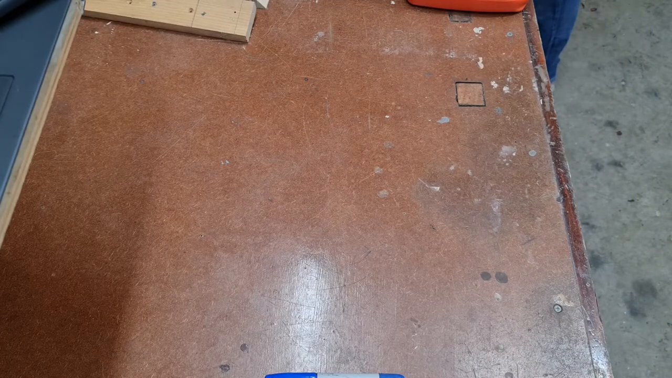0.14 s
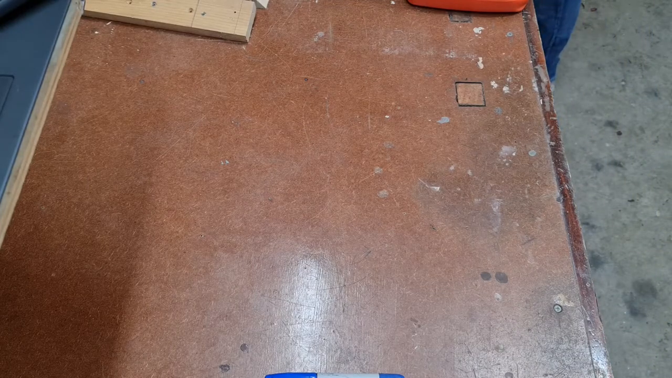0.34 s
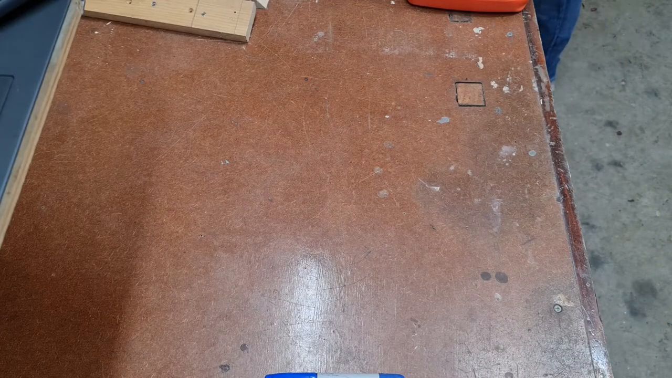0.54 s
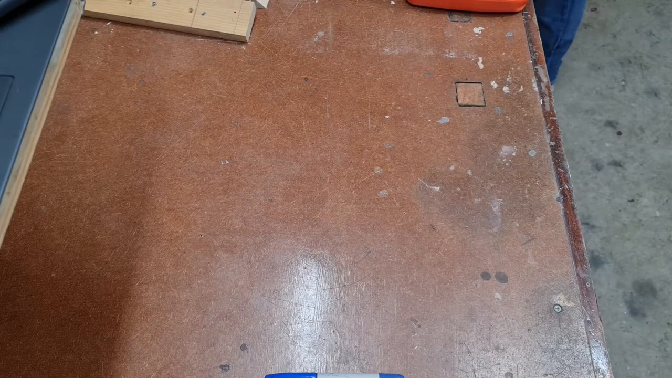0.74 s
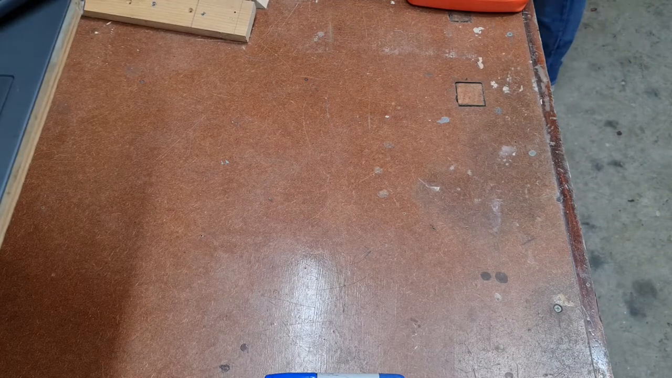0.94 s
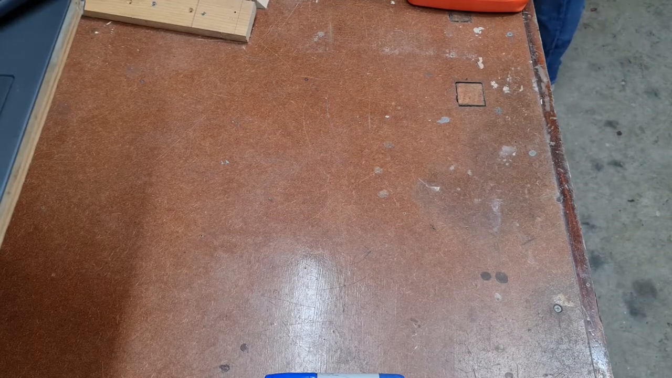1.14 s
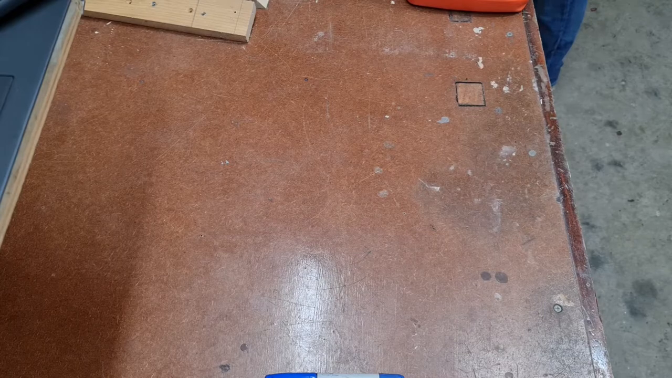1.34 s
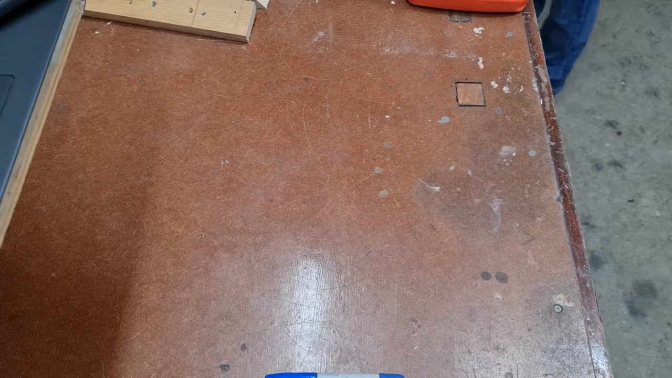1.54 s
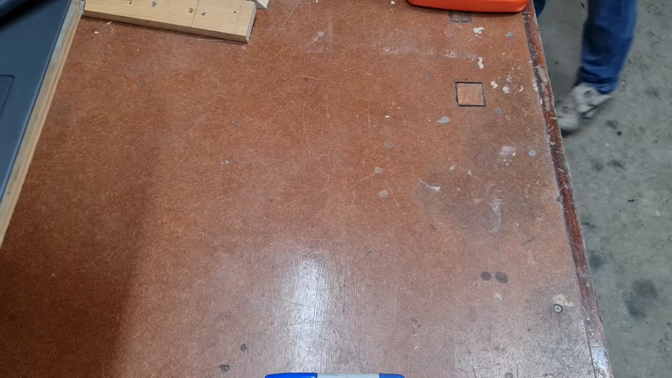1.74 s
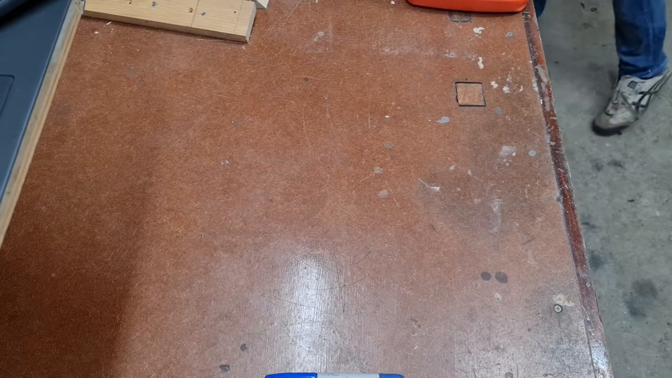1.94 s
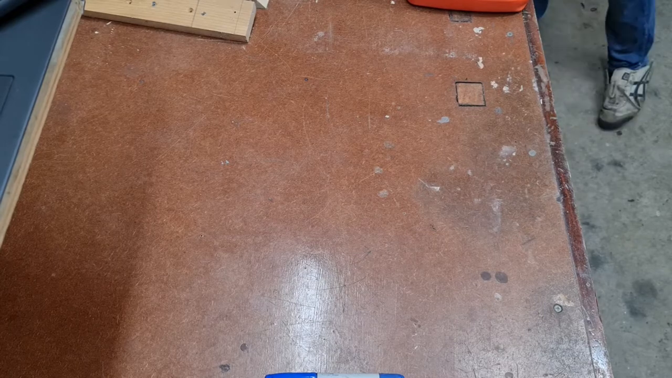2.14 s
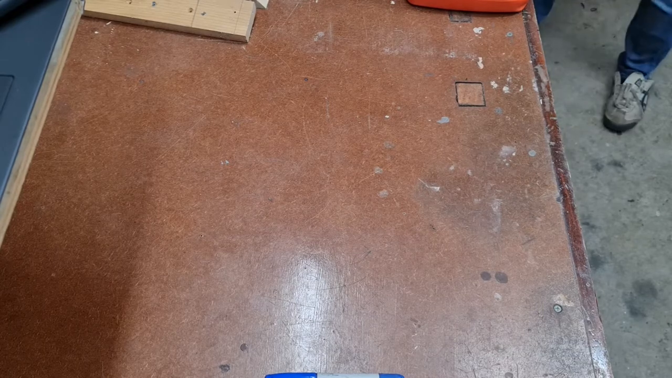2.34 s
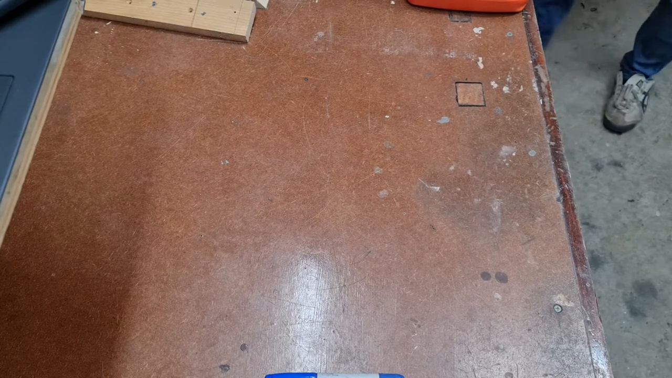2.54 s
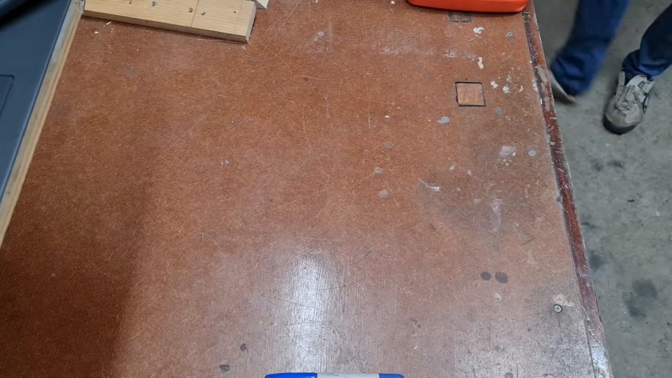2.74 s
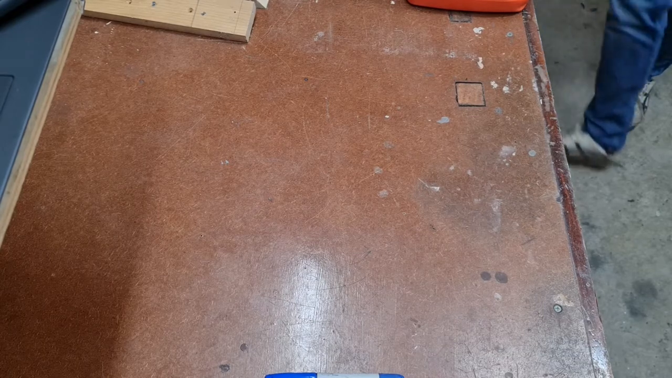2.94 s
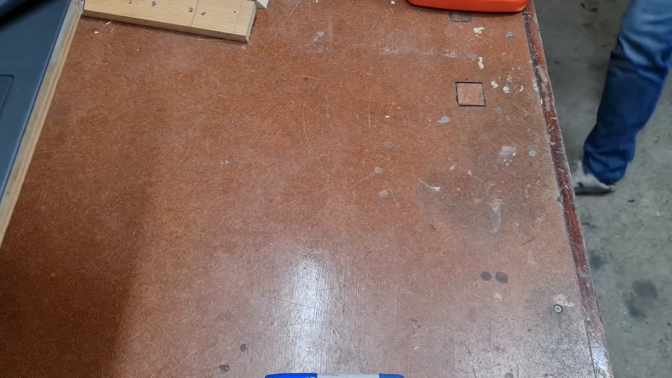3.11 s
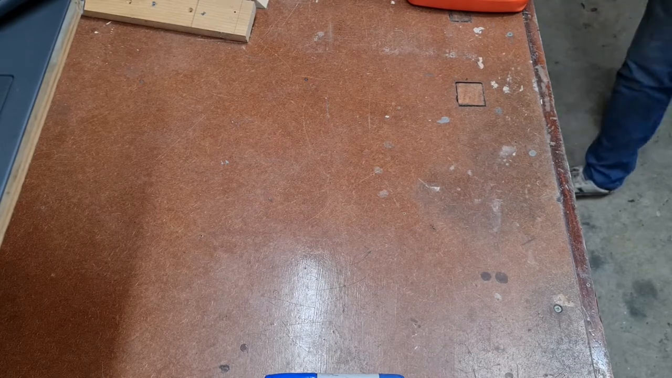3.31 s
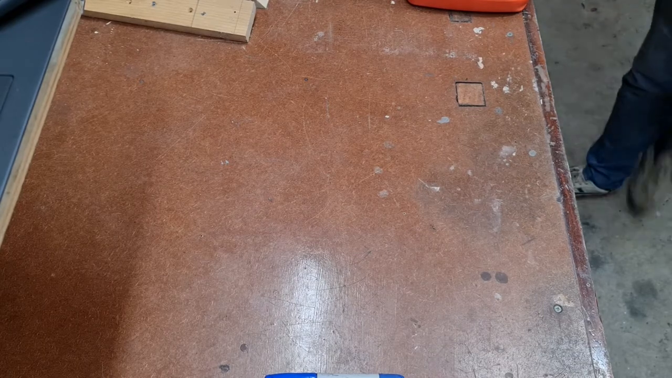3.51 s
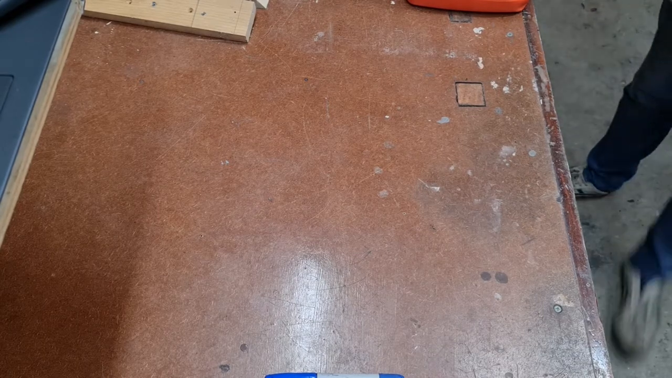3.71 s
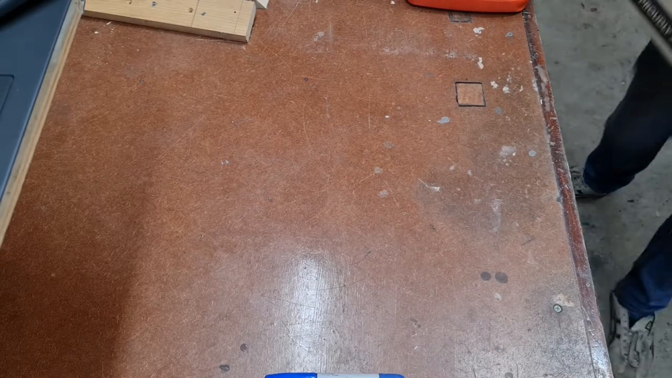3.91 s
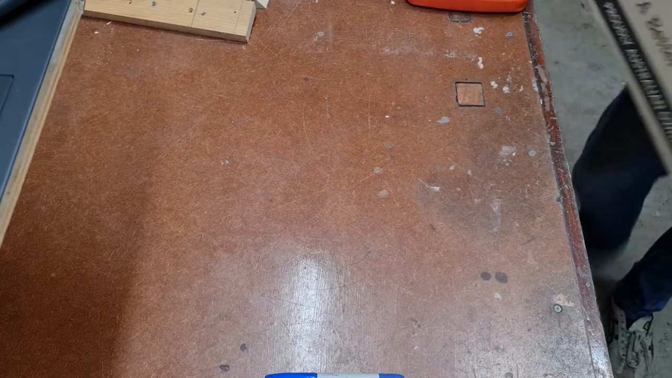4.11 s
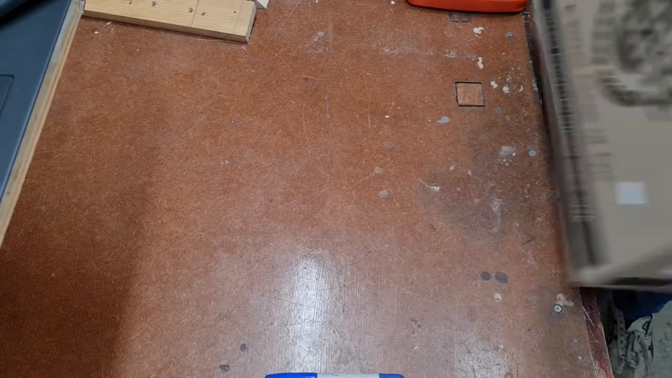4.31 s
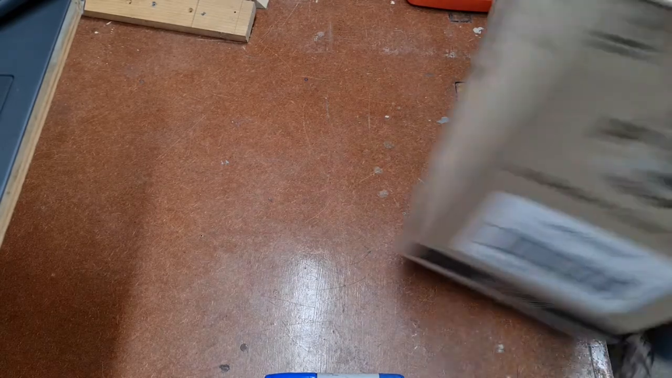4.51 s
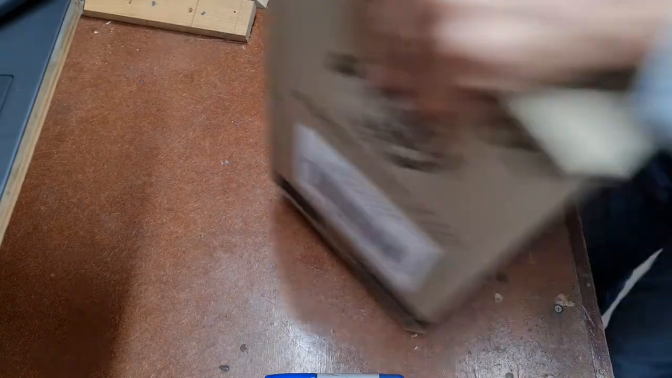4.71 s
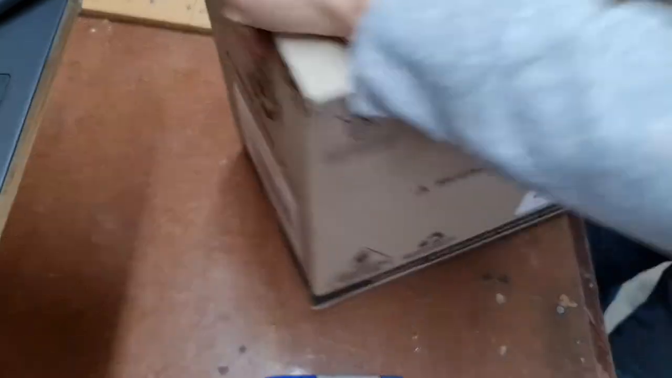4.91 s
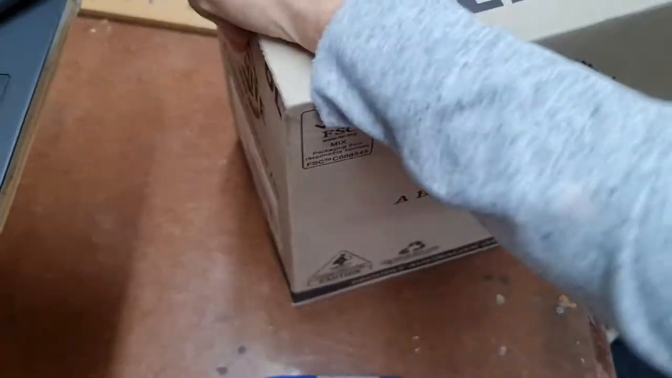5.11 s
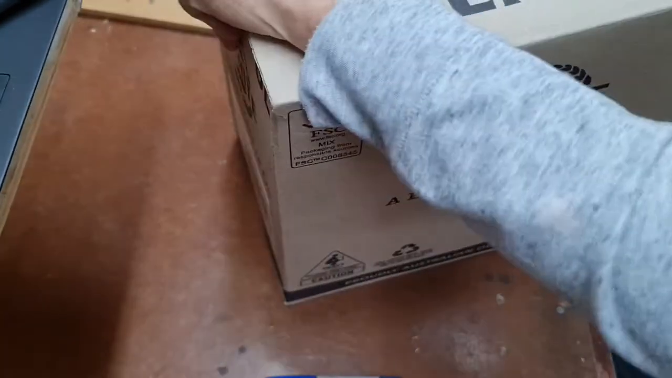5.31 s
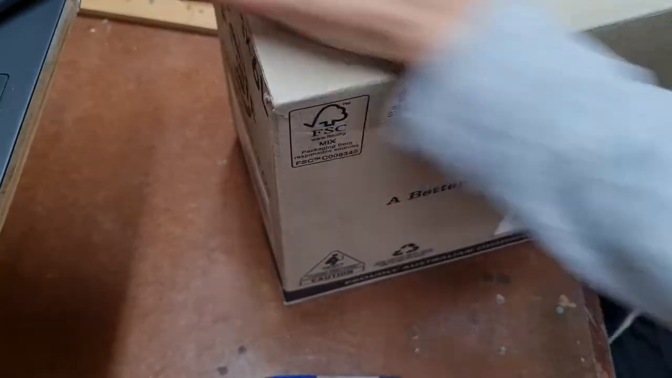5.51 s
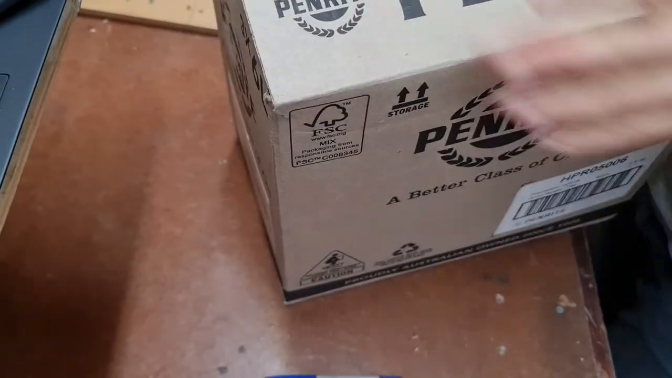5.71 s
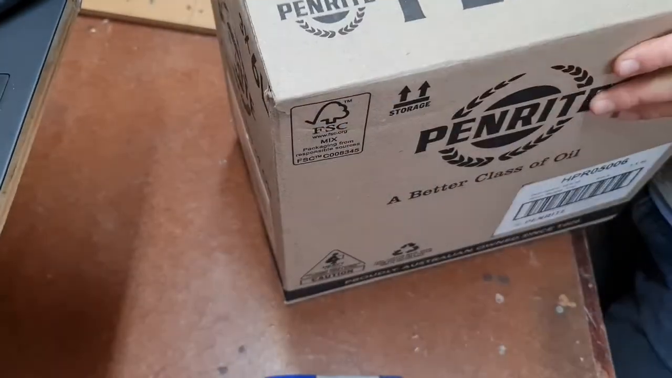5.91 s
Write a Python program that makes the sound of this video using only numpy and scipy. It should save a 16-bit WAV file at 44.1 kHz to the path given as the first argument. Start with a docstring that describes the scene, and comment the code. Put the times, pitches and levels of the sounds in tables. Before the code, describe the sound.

A close stereo microphone on a workbench hears faint garage hum, a box dragged and knocked early on, then quiet shuffling steps with a tiny clink. Light card bumps lead into a sudden heavy slam, edge first and then the whole base slapping down on wood. Loose metal buzzes briefly; afterwards come soft card rubbing, a snap and little squeaks.

```python
"""A cardboard box is dragged up, carried past with shuffling steps and light knocks, then dropped on a
wooden bench: one edge lands, the rest slaps down. Knocks ring the box panels, bumps ring the bench.
Metal things on the bench rattle as buzzing clusters of tones. Hands rub (shaped noise) and squeak
(uneven tones) on the card, small things clink and snap; the garage adds a low noisy hum and a short echo."""
import sys
import numpy as np
from scipy import signal
from scipy.fft import rfft, irfft, next_fast_len
from scipy.io import wavfile
from scipy.ndimage import uniform_filter1d

SR = 44100
rng = np.random.default_rng(int(sys.argv[2]) if len(sys.argv) > 2 else 0)


def file_out(sig):
    """Save sig as 16-bit WAV at sys.argv[1]."""
    # one column per channel
    cols = np.atleast_2d(sig).T
    # limit, then scale
    lim = np.clip(cols, -1, 1)
    pcm = np.round(lim * 32767).astype(np.int16)
    wavfile.write(sys.argv[1], SR, pcm)


N = 266974
T = np.arange(N) / SR

# Ringing panels of the box: f/Hz, relative level/dB, time to die by 60 dB/s
BOX_PANELS = [(165.2, 13.5, 0.054), (272, -2.5, 0.54), (319, -1, 0.33), (410, -3.5, 0.29), (461, 9, 0.035),
              (505.7, -8, 0.3), (598.5, 3.5, 0.074), (660.7, -6, 0.26), (733.5, 6.5, 0.038),
              (826.6, 8, 0.059), (965, 0, 0.033), (1142, -7.5, 0.2), (1290.5, 10, 0.033),
              (1450, -4.5, 0.056), (1521, -5.5, 0.08), (1699, -4, 0.24), (2380, -7, .08),
              (2652, -2.5, 0.08)]


def knocks(mix):
    """Each contact rings the panels near its colour, crumples the card and scuffs it."""
    # Knocks and steps: t/s, peak level/dB, colour f/Hz, narrowness/(dB per octave squared),
    # added damping as time to die by 60 dB/s
    knock_list = [(0.759, -14.5, 1230, 18, 0.11), (0.797, -38, 1580, 15, 0.076),
                  (0.911, -36, 1090, 22, 0.087), (1.069, -41.5, 520, 16, 0.078),
                  (1.326, -36, 423, 56, 0.12), (1.325, -44, 1260, 44, 0.048), (1.495, -41, 404, 59, 0.2),
                  (1.585, -50, 410, 44, 0.1), (1.894, -49.5, 470, 15, 0.14), (2.075, -47.5, 307, 19, 0.11),
                  (2.34, -44.5, 520, 25, 0.17), (2.454, -50, 422, 38, 0.073), (3.157, -45.5, 634, 20, 0.14),
                  (3.249, -47, 296, 16, 0.064), (3.69, -48.5, 316, 25, 0.13), (3.734, -41.5, 555, 28, 0.11),
                  (3.87, -47.5, 500, 4.5, 0.15), (3.918, -45.5, 920, 5, .11),
                  (4.148, -47.5, 540, 22, 0.044), (4.357, -45.5, 800, 2.5, 0.21),
                  (4.575, -35.5, 302.4, 0, 0.25), (4.65, -41, 305, 3, 0.031),
                  (4.732, -40.5, 406, 22, 0.078), (4.781, -32.5, 310, 9, 0.073),
                  (4.857, -31, 390, 1.5, .36), (4.902, -12, 590, 6, 0.094), (4.9126, -1.5, 840, 31, 0.061),
                  (4.925, -11, 792, 22, 0.14), (4.932, -11, 373, 28.5, 0.086), (4.953, -18, 635, 32, 0.066),
                  (4.974, -18, 630, 31, 0.066), (5.036, -10.5, 398, 1.5, 0.065),
                  (5.049, -10, 876, 3.5, 0.059), (5.06, -12, 814, 8, 0.049), (5.09, -24.5, 1630, 21, 0.066),
                  (5.077, -15, 443, 8, 0.064), (5.11, -21, 340, 7.5, 0.097), (5.58, -32.5, 451, 8, 0.18),
                  (5.925, -35, 796, 2, 0.17)]
    panel_count = len(BOX_PANELS)
    for s, db, colour_hz, narrow_db, t60 in knock_list:
        contact_s = .0058 + .00006 * db  # a harder knock squashes the card for longer
        t = np.arange(round(.3 * SR)) / SR
        u = t / contact_s  # time counted in contacts

        # where the knock lands changes each panel's level and phase; the grip detunes it a little
        spot_db = 2 * rng.standard_normal(panel_count)
        phase = rng.uniform(0, 2 * np.pi, (panel_count, 1))
        bend = 1 + 0.0063 * rng.standard_normal(panel_count)
        modes = []
        for (hz, level, decay), spot, b in zip(BOX_PANELS, spot_db, bend):
            octaves_off = np.log2(hz / colour_hz)
            modes.append((hz * b, level + spot - narrow_db * octaves_off ** 2, decay))
        panels = ring(modes, .3, t60, 2.6 * contact_s, phase)

        crumple_shape = u ** 2 * np.exp(-.8 * u)
        band = signal.butter(3, [colour_hz * 0.65, colour_hz * 1.46], "band", fs=SR, output="sos")
        crumple = signal.sosfilt(band, rng.standard_normal(len(u)) * crumple_shape)

        # card swallows the treble of a scuff
        scuff_band_hz = [min(colour_hz * 0.37, 600), min(colour_hz * 2.66, 1560)]
        scuff_shape = np.minimum(u / 2, 1) * gain_of(-60 * t / (1.7 * t60))
        wide = signal.butter(7, scuff_band_hz, "band", fs=SR, output="sos")
        scuff = signal.sosfilt(wide, rng.standard_normal(len(u)) * scuff_shape)
        scuff_share = .2 - .007 * db  # light steps scuff more than hard blows

        knock = evened(panels) + 0.49 * evened(crumple) + scuff_share * evened(scuff)
        add(mix, s - .002, peaked(knock, db))  # the swell starts just before the listed time


def bench(mix):
    """Each low bump is a half-sine push ringing the slab; in the landing they crowd into a shuddering thud."""
    # Weight of the box bumping on wood: t/s, peak level/dB, contact time/s
    bumps = [(0.765, -27, 0.0029), (0.79, -28, 0.0027), (1.075, -36, 0.0037), (1.299, -37, .005),
             (1.345, -31.5, 0.0029), (4.581, -31, 0.0032), (4.784, -33, 0.0035), (4.902, -11, 0.0066),
             (4.935, -1.5, 0.0043), (4.954, -3, .0044), (4.967, -13, 0.0049), (4.993, -11, 0.0027),
             (5.043, -15, 0.0091), (5.068, -7, 0.0036), (5.109, -19, 0.0038), (5.135, -26, 0.0072),
             (5.215, -37, 0.0024), (5.88, -34.5, 0.0089), (5.963, -29.5, 0.0028)]
    # Modes of the bench: f/Hz, relative level/dB, time to die by 60 dB/s
    slab_modes = [(74, -28, 0.98), (102, -5.5, 0.17), (146.8, 8.5, 0.13), (194, 8, 0.084),
                  (266.5, 12.5, 0.059)]
    slab = ring(slab_modes, .5)
    for s, db, contact_s in bumps:
        push = np.sin(np.linspace(0, np.pi, round(contact_s * SR)))
        add(mix, s, peaked(signal.fftconvolve(push, slab), db))


def tools():
    """Noisy shaking makes each loose metal piece buzz at three close modes, in a fit of its own."""
    # Metal pieces: f/Hz, level/dB, time to die by 60 dB/s, fit at full from t/s, fit held for/s
    pieces = [(1810, -43.5, 0.039, 5.08, 0.078), (2330, -44.5, 0.028, 5.078, 0.057),
              (2670, -42, 0.017, 4.912, .02), (3770, -56.5, 0.034, 5.146, 0.09),
              (1770, -59.5, 0.039, 5.21, 0.092), (2840, -46, 0.012, 4.978, 0.01),
              (6150, -63, .03, 5.12, 0.08), (2300, -62.5, .02, 5.21, 0.093)]
    split = .012  # share by which the close modes lie apart
    shaking = grit(2500, 0.5, 0.38)
    rattle = np.zeros(N)
    for hz, db, t60, s, lasts in pieces:
        cluster = [(hz * (1 + split * k), 0, t60) for k in (-1, .5, 1)]
        buzz = signal.oaconvolve(shaking, ring(cluster, .1))[:N]
        rattle += stroke(s, .02, lasts, .045, db) * evened(buzz)
    return rattle


def rubbing():
    """Fibres hiss, pressed card scrapes through the box panels, the load rumbles; all are shaped noise."""
    # Colour of rubbed fibres: f/Hz, relative level/dB
    hiss_colour = [(710, -8.5), (1200, -8), (1280, -2.5), (2010, -5.5), (2970, -4.5), (3490, -7),
                   (9620, -14.5), (11900, -13), (15800, -17.5)]
    # Colour of scraped card: f/Hz, relative level/dB
    scrape_colour = [(88, 4), (150, -7), (342, 0.5), (463, 1.5), (553, -6), (617, 0.5), (830, -3),
                     (1150, -5), (1510, -4), (4000, -19.5), (5200, -84.5)]
    # Colour of the load's rumble: f/Hz, relative level/dB
    weight_colour = [(26, -34.5), (52, 1.5), (76, 4.5), (120, -9.5), (190, -10.5), (260, -20), (400, -66)]
    # Strokes of card, cloth and soles: full from t/s, swell/s, hold/s, fade/s, hiss level/dB,
    # brightness at the top of the band/dB
    strokes = [(0, .1, 0.46, .3, -70.5, -3), (0.529, 0.069, 0.24, .2, -60, -9),
               (0.762, 0.2, 0.053, 0.19, -42.5, 1), (0.9, .2, 0.16, 0.078, -54, -1),
               (1.271, 0.1, .01, 0.083, -57.5, 2), (1.35, 0.12, 0.23, 0.072, -67, -18),
               (1.817, 0.29, 0.011, 0.55, -68, -1.5), (2.4, 0.22, 0.14, 0.65, -70.5, -3),
               (2.572, 0.041, .01, 0.062, -61.5, -3), (2.64, 0.02, 0.0038, 0.088, -56, -23),
               (2.914, 0.21, 0.18, 0.16, -74.5, 2.5), (3.268, 0.26, 0.14, 0.19, -61, -0.5),
               (3.466, 0.065, 0.2, 0.2, -66.5, 6.5), (3.98, 0.51, 0.13, 0.98, -70, 2.5),
               (4.355, 0.044, 0.13, .1, -59.5, -2.5), (4.578, 0.078, 0.05, 0.045, -46, -1.5),
               (4.88, 0.15, .01, .05, -52, -13.5), (4.9, 0.0066, .003, 0.082, -31.5, -6),
               (5.052, 0.08, 0.013, 0.13, -40, -4.5), (5.255, 0.08, .05, 0.077, -62, -1),
               (5.471, 0.073, 0.15, 0.1, -54, 0), (5.804, 0.016, 0.11, 0.056, -52, 4.5),
               (6.029, 0.14, .01, 0.087, -57.5, -3)]
    # The load being handled: t/s, pressed and scraped card level/dB, weight in the bass level/dB
    handling = [(0, -59.5, -55), (.42, -60, -52.5), (.52, -47.5, -53), (.69, -51, -73), (.86, -44.5, -62),
                (1.16, -58.5, -53.5), (1.32, -51.5, -53.5), (1.65, -67, -69.5), (4.3, -69, -74.5),
                (4.37, -59, -61), (4.88, -50.5, -57), (5.02, -33.5, -38), (5.06, -29.5, -25.5),
                (5.17, -50, -30.5), (5.25, -54, -41.5), (5.36, -59, -50.5), (5.48, -45, -56),
                (5.759, -66.5, -76), (5.95, -47.5, -45.5), (6.05, -50.5, -48)]

    fibres = patchy(coloured(grit(3000, 1.2, 0.3), hiss_colour), 2.2, frames=8, bins=6)
    fine = signal.lfilter(*signal.butter(2, 7000, "high", fs=SR), fibres)
    power = np.array([stroke(*row[:5]) ** 2 for row in strokes])
    brightness = gain_of(np.array(strokes)[:, 5])
    level = np.sqrt(power.sum(0))
    top = np.sqrt(brightness ** 2 @ power)
    hiss = level * fibres + (top - level) * fine  # each stroke has its own treble

    s, press_db, weight_db = np.transpose(handling)
    press = gain_of(np.interp(T, s, press_db))
    weight = gain_of(np.interp(T, s, weight_db))
    scrape = coloured(grit(900, 1.2, 0.38), scrape_colour)
    panels = signal.oaconvolve(scrape, ring(BOX_PANELS, .2, 0.098))[:N]
    card = patchy(evened(scrape) + 0.72 * evened(panels), 3.55, frames=8, bins=3)
    rumble = evened(coloured(grit(150, 3.1, 0.32), weight_colour))
    return hiss + press * card + weight * rumble


def squeaks(mix):
    """Uneven stick and slip makes a gliding tone with one overtone, wavering in pitch and level."""
    # A sole on concrete, skin on card: start t/s, length/s, first f/Hz, last f/Hz,
    # first level/dB, last level/dB (both before the wavering), pitch jitter/share
    squeak_list = [(2.63, .045, 2950, 2760, -56, -65, 0.093), (5.702, 0.083, 2190, 2380, -65, -72, .03),
                   (5.813, 0.063, 1313, 1235, -45, -52, .06), (5.883, 0.0515, 1255, 1394, -66, -49, 0.076),
                   (6.01, 0.048, 1355, 1450, -55, -53, 0.11)]
    for s, length, first_hz, last_hz, first_db, last_db, jitter in squeak_list:
        count = len(np.arange(0, length, 1 / SR))
        wobble = evened(uniform_filter1d(rng.standard_normal(count), 60))
        hz = np.linspace(first_hz, last_hz, count) * (1 + jitter * wobble)
        turn = 2 * np.pi * np.cumsum(hz) / SR
        waver_db = 2.5 * evened(uniform_filter1d(rng.standard_normal(count), 200))
        tone = (np.sin(turn) + 0.26 * np.sin(2 * turn)) * gain_of(waver_db)
        level = gain_of(np.linspace(first_db, last_db, count))
        add(mix, s, tone * level * signal.windows.tukey(count, .2))


def clinks(mix):
    """A small hard thing bounces and chatters; the first landing favours lower modes, the later two higher."""
    # Landings: t/s, peak level/dB, favoured f/Hz
    landings = [(3.016, -39, 2070), (3.041, -46, 2700), (3.074, -56, 2700)]
    # Modes of the small thing: f/Hz, relative level/dB, time to die by 60 dB/s
    thing_modes = [(1670, -9, 0.085), (1591, 2, 0.047), (2606, -8.5, 0.08), (2720, -1, 0.033),
                   (3400, -8, 0.027), (850, 4, 0.04), (1230, -7.5, 0.04)]
    for s, db, favoured_hz in landings:
        modes = [(hz, level - 12 * np.log2(hz / favoured_hz) ** 2, t60) for hz, level, t60 in thing_modes]
        phase = rng.uniform(0, 2 * np.pi, (len(modes), 1))
        tone = ring(modes, .25, 0.1, 0.0092, phase)
        chatter = evened(uniform_filter1d(rng.standard_normal(len(tone)), 70))  # on the floor
        add(mix, s, peaked(tone * (1 + 0.31 * chatter), db))


def snaps(mix):
    """A first sharp break and dying crackle, both kept to one band of pitch."""
    # Card, and grit under a sole: t/s, peak level/dB, f/Hz, crackle's time to die by 60 dB/s
    snap_list = [(2.632, -45, 5000, .02), (2.6405, -43, 8950, .01), (3.016, -47, 4000, .03),
                 (4.9008, -25, 8600, 0.01), (5.7748, -31.5, 2080, 0.035)]
    t = np.arange(1500) / SR
    for s, db, hz, t60 in snap_list:
        crack = rng.standard_normal(1500) * gain_of(-60 * t / t60)
        crack[0] += 29  # the first break stands far above the crackle
        band = signal.butter(3, [hz * 0.49, hz * 1.23], "band", fs=SR)
        add(mix, s, peaked(signal.lfilter(*band, crack), db))


def garage(x):
    """Echo of two channels: sparse taps of random sign, each band dying at its own speed."""
    # Echo decay of the garage: f/Hz, time to die by 60 dB/s
    decay = [(100, 0.35), (500, 0.48), (2000, 0.33), (8000, 0.46)]
    taps = np.zeros((2, SR))
    # one tap at a random place in every 20 samples
    at = np.arange(300, SR - 20, 20) + rng.integers(0, 20, (2, (SR - 301) // 20))
    np.put_along_axis(taps, at, rng.choice([-1., 1.], at.shape), 1)
    hz, t, z = signal.stft(taps, SR, nperseg=256)
    fade = gain_of(-60 * t / read(decay, hz)[:, None])
    tail = signal.istft(z * fade, SR, nperseg=256)[1]
    return signal.fftconvolve(x[None], tail / np.linalg.norm(tail[0]), axes=1)[:, :N]


def garage_hum():
    """The garage's low hum: two channels of steady noise, strongest in the bass."""
    # Colour of the hum: f/Hz, relative level/dB
    hum_colour = [(22, -0.5), (42, 18.5), (65, 19.5), (110, -0.5), (197, -24), (335, 4), (482, -17.5),
                  (693, -10), (1050, -37.5), (1250, -30), (7650, -21.5), (15800, -105.5)]
    return gain_of(-59.5) * evened(coloured(rng.standard_normal((2, N)), hum_colour))


def apart(x):
    """Paths to two microphones differ: the phase wanders around a quarter turn with pitch and time."""
    z = signal.stft(x, nperseg=512)[2]
    field = rng.standard_normal(z.shape[::-1])
    drift = evened(uniform_filter1d(uniform_filter1d(field, 9, 0), 5, 1)).T
    turned = z * np.exp(1j * (np.pi / 2 + 1.02 * drift))  # radians
    return signal.istft(turned, nperseg=512)[1][:N]


def gain_of(db):
    """Turns decibels into gain."""
    return 10 ** (np.asarray(db) / 20)


def evened(x):
    """Scales to an rms (average strength) of 1."""
    return x / np.sqrt(np.mean(x ** 2) + 1e-20)


def peaked(x, db):
    """Scales to a peak level."""
    return gain_of(db) * x / abs(x).max()


def add(mix, s, sound):
    """Places a sound in the mix at s seconds."""
    part = mix[round(s * SR):][:len(sound)]
    part += sound[:len(part)]


def read(points, hz):
    """Reads (f/Hz, value) points on a log frequency axis."""
    f, value = np.transpose(points)
    return np.interp(np.log(hz + 1), np.log(f + 1), value)


def coloured(x, points):
    """Filters by a spectrum given as (f/Hz, level/dB) points."""
    size = next_fast_len(x.shape[-1])
    gain = gain_of(read(points, np.fft.rfftfreq(size, 1 / SR)))
    return irfft(rfft(x, size) * gain, size)[..., :x.shape[-1]]


def ring(modes, seconds, extra_t60=np.inf, contact=1e-5, phase=0):
    """Sum of dying sines; a soft contact makes them swell, a hand or a surface adds damping."""
    t = np.arange(round(seconds * SR)) / SR
    hz, db, t60 = np.transpose(modes)[:, :, None]
    swell = 1 - np.exp(-(t / contact) ** 2)
    dying = gain_of(db - 60 * t / t60 - 60 * t / extra_t60)
    return swell * (dying * np.sin(2 * np.pi * hz * t + phase)).sum(0)


def grit(per_s, spread_db, share):
    """Rough surfaces: steady noise mixed with a share of sparse slips of uneven size."""
    size = gain_of(spread_db * np.minimum(rng.exponential(1, N), 4))
    slips = size * rng.standard_normal(N) * (rng.random(N) < per_s / SR)
    return share * evened(slips) + (1 - share) * rng.standard_normal(N)


def patchy(x, depth_db, frames, bins):
    """Uneven surfaces: level drifts in patches of time and pitch."""
    z = signal.stft(x, nperseg=256)[2]
    field = rng.standard_normal(z.shape[::-1])
    field = uniform_filter1d(uniform_filter1d(field, frames, axis=0), bins, axis=1)
    return evened(signal.istft(z * gain_of(depth_db * evened(field).T), nperseg=256)[1][:N])


def stroke(s, swell, hold, fade, db):
    """Gain of one movement: climbs 20 dB over the swell, holds from s, drops 20 dB over the fade."""
    t = T[::32]  # a coarse clock is enough
    away = np.maximum((s - t) / swell, (t - s - hold) / fade)
    return np.interp(T, t, gain_of(db - 20 * np.maximum(away, 0)))


def scene():
    """All sources, the echo and the hum, spread between two microphones."""
    # The carrier walks round to the bench: t/s, echo over direct sound level/dB, left over right level/dB
    walk = [(0, -10, 1), (1.5, -5, -0.5), (2.5, -8, -0.5), (4, -4, -2), (4.7, -12, -0.5), (6.05, -9.5, -1)]
    # Stereo spread, gain of the side signal: f/Hz, level/dB
    side_colour = [(40, -15), (150, -13), (300, -4), (700, 1), (2000, 1.5), (5500, 0.5), (7500, -6.5),
                   (15000, -23)]
    hits = np.zeros(N)
    for source in (knocks, bench, squeaks, clinks, snaps):
        source(hits)
    near = hits + tools() + rubbing()

    s, echo_db, lean_db = np.transpose(walk)
    echo = garage(near * gain_of(np.interp(T, s, echo_db)))
    hum = garage_hum()
    mid = near + echo[0] + hum[0]
    side = coloured(apart(near) + echo[1] + hum[1], side_colour)
    lean = gain_of(np.interp(T, s, lean_db) / 2)  # half the difference goes to each channel
    return np.array([(mid + side) * lean, (mid - side) / lean])


def record(dry):
    """The small microphone loses the deepest bass and rounds off loud peaks; then the treble is cut off."""
    thin = signal.sosfilt(signal.butter(2, 42, "high", fs=SR, output="sos"), dry)
    rounded = np.tanh(thin)
    band_limit = signal.firwin(511, 15900, window=("kaiser", 9), fs=SR)
    return signal.oaconvolve(rounded, band_limit[None], "same")


dry = scene()
out = record(dry)
file_out(out)
```